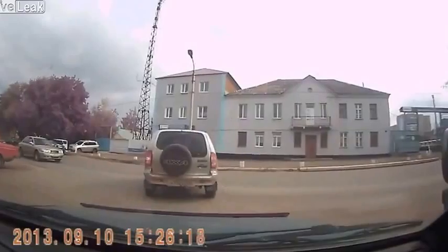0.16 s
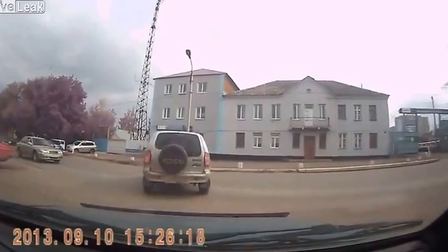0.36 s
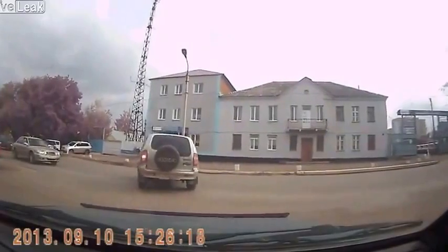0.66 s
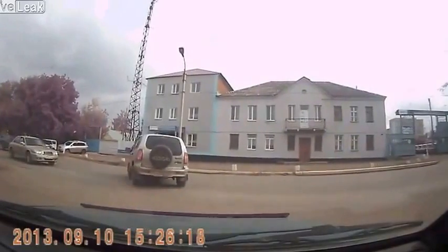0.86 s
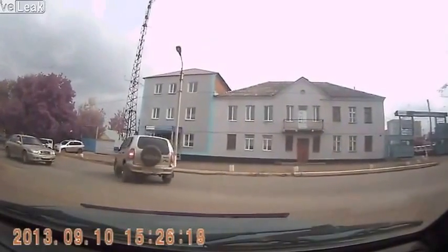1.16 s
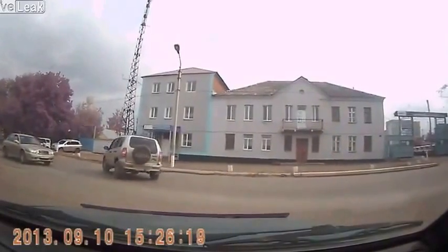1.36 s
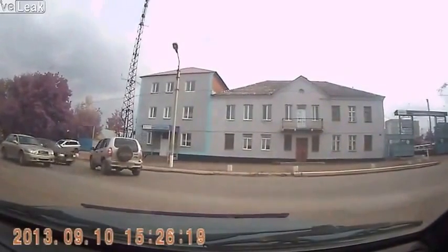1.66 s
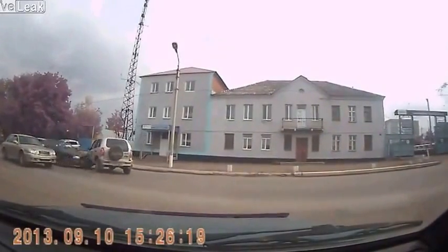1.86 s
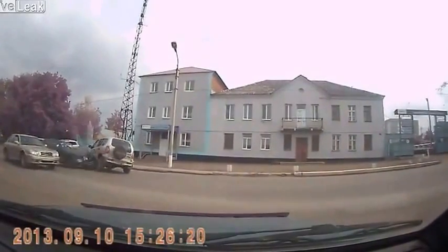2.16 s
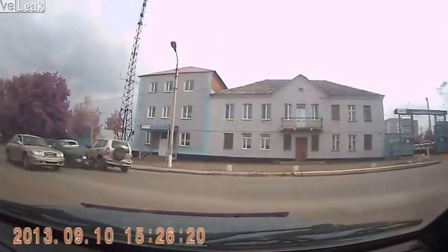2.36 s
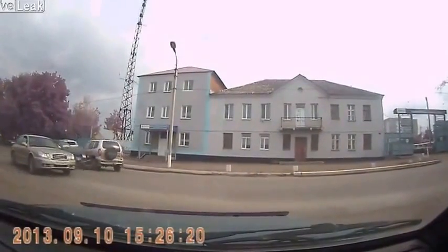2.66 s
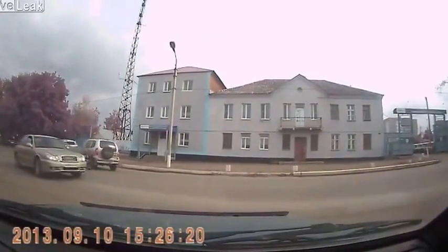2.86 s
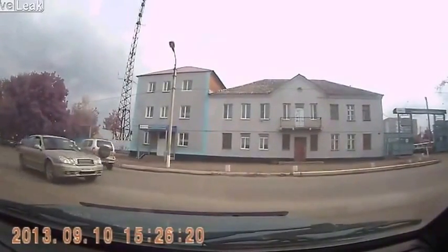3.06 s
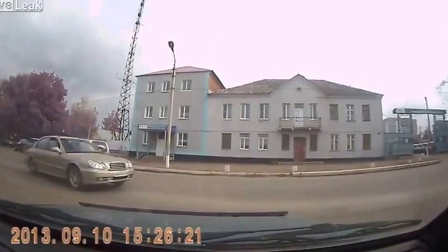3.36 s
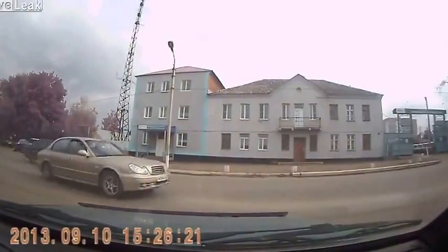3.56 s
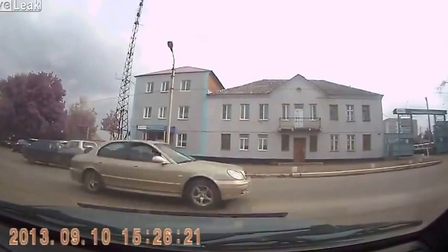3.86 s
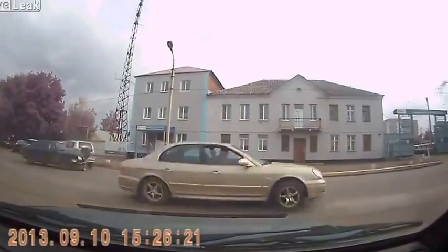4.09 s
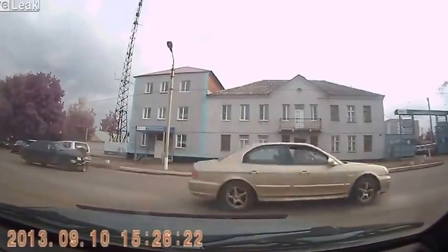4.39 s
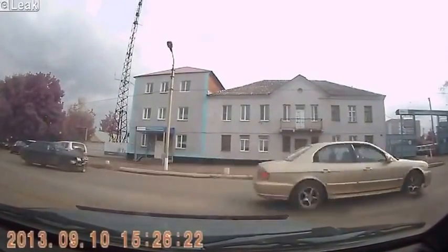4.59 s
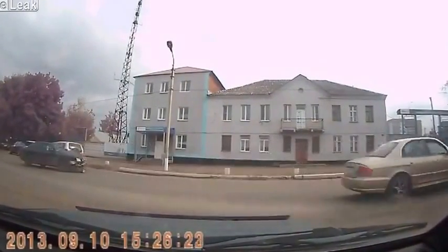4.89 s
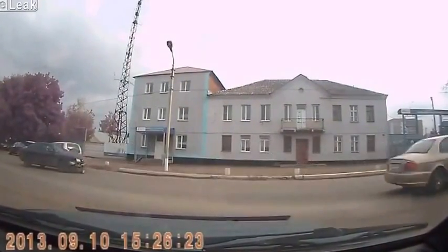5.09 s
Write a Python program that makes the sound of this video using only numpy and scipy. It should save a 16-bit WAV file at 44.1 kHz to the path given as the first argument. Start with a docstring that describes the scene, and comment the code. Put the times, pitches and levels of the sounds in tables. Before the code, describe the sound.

Heard from inside a rumbling car, another car's tyres squeal in a hard skid that ends in a short, dull crunch.

```python
"""A car's engine booms in the cabin as the car rolls to a stop and idles; the road rumbles and shakes
the trim. Ahead, another car brakes hard: its tyres stick and slip on the road, so they squeal, sinking
in pitch, until it hits something with a short dull crunch. Soft handling thumps sound close by, plastic
trim clicks, a car drives past and something squeaks faintly. A dashboard camera hears it all and loses
the high treble."""
import sys
import numpy as np
from scipy import signal
from scipy.fft import rfft, irfft, next_fast_len
from scipy.io import wavfile
from scipy.ndimage import uniform_filter1d

SR = 44100
rng = np.random.default_rng(int(sys.argv[2]) if len(sys.argv) > 2 else 0)


def generate_wav(sig):
    """Save sig (samples, or channels by samples) to the path in sys.argv[1] as 16-bit PCM at SR."""
    pcm = np.round(np.clip(np.atleast_2d(sig).T, -1, 1) * 32767).astype(np.int16)
    wavfile.write(sys.argv[1], SR, pcm)


N = 230863
T = np.arange(N) / SR
CRASH_S = 2.055
OVERTONE_GROWTH_DB_PER_S = 12  # the skid's high sounds swell as the braking car nears


def undb(db):
    """Turn decibels into a number to multiply by."""
    return 10 ** (np.asarray(db) / 20)


def unit(x):
    """Scale a signal so that its average power is 1."""
    return x / np.sqrt(np.mean(x ** 2) + 1e-18)


def curve(points):
    """Join (time, value) points with straight lines."""
    return np.interp(T, *np.transpose(points))


def glide(start, length, first_hz, last_hz):
    """A pitch that moves evenly from one value to another."""
    return np.interp(T, [start, start + length], [first_hz, last_hz])


def envelope(start, length, attack_s, fall_db_per_s):
    """A loudness that rises to 1, holds until the length is over, then dies away."""
    age = T - start
    return np.clip(age / attack_s, 0, 1) * undb(-fall_db_per_s * np.maximum(age - length, 0))


def wander(rate):
    """A smooth random wobble of typical size 1 that changes about rate times a second."""
    size = next_fast_len(N, real=True)
    hz = np.arange(size // 2 + 1) * SR / size
    spectrum = rfft(rng.standard_normal(size)) * np.exp(-(hz / rate) ** 2)
    return unit(irfft(spectrum, size)[:N])


def shape(x, points):
    """Turn each frequency up or down along a line of (frequency [Hz], gain [dB]) points."""
    hz, db = np.transpose(points)
    all_hz = np.arange(N // 2 + 1) * SR / N + 1
    gain = undb(np.interp(np.log(all_hz), np.log(hz), db))
    return irfft(rfft(x) * gain, N)


def band(x, low_hz, high_hz):
    """Keep what lies between two frequencies, without delaying it."""
    sos = signal.butter(3, [low_hz, high_hz], "band", fs=SR, output="sos")
    return signal.sosfiltfilt(sos, x, padtype=None)


def resonate(x, modes):
    """Make a sound ring at each (frequency [Hz], width [Hz], gain [dB])."""
    return sum(undb(db) * signal.lfilter(*signal.iirpeak(hz, hz / width, SR), x)
               for hz, width, db in modes)


def echoes(x, fade_s, echo_db):
    """Add a dense cloud of reflections that dies away by 60 dB in fade_s."""
    t = T[:SR // 2]
    tail = rng.standard_normal(len(t)) * np.exp(-np.log(1000) * t / fade_s)
    return x + undb(echo_db) * signal.fftconvolve(x, tail / np.linalg.norm(tail))[:N]


def engine_firings():
    """Count the firings so far: the engine labours as the car slows, then recovers to idle."""
    # engine speed: (time [s], firing rate [Hz])
    firing_rate = [(0, 25.99), (.42, 27.48), (.78, 23.76), (1.22, 23.5), (1.34, 30.32), (1.95, 30.21),
                   (2.5, 28.64), (3.7, 29.65), (4.2, 28.81), (5.23, 29.29)]
    return np.cumsum(curve(firing_rate)) / SR


def engine(firings):
    """Firings pump the cabin air; the boom has stronger overtones while the car still rolls."""
    # tones of the boom: (multiple of the firing rate, gain while rolling [dB], gain at idle [dB])
    harmonics = [(1, 1.25, 0.35), (2, -10.5, -24), (3, -17, -23), (4, -18.5, -28.5), (5, -21.5, -28)]
    # loudness of the whole boom: (time [s], level [dB])
    loudness = [(0.0, -19), (0.35, -20.5), (0.44, -31.5), (0.49, -21.5), (0.76, -19.5), (0.86, -28.5),
                (1.02, -24), (1.22, -31), (1.28, -23.5), (2.08, -30), (2.14, -21), (2.46, -38), (2.64, -26),
                (3.19, -28.5), (3.58, -21.5), (3.95, -27.5), (4.08, -21), (5.23, -23)]
    idle = np.clip((T - .9) / .5, 0, 1)
    boom = 0
    for k, rolling_db, idle_db in harmonics:
        wobble_db = (1.3 if k == 1 else 2.6) * wander(10)
        db = rolling_db + (idle_db - rolling_db) * idle + wobble_db
        boom += undb(db) * np.sin(2 * np.pi * (k * firings + rng.random()))
    return np.sqrt(2) * boom * undb(curve(loudness))


def road(firings, passing):
    """Road noise comes through the body and swells when it shakes or a car passes; the trim chatters."""
    # tone of the road through the body: (frequency [Hz], gain [dB])
    road_colour = [(24, -47.5), (40, -2.5), (65, -5.5), (81, -15), (98, -17), (135, -11.5), (182, -22),
                   (236, -23), (302, -22.5), (444, -28.5), (535, -24.5), (763, -36.5), (932, -30),
                   (1330, -34.5), (1600, -49), (2080, -78.5), (3520, -120)]
    # tone of the hiss and rattle: (frequency [Hz], gain [dB])
    hiss_colour = [(880, -45), (1500, -7.5), (1680, -12), (1960, -2.5), (2040, 2.5), (2130, -7), (2250, -2),
                   (2350, -6.5), (2440, -9), (2720, -7), (3360, -10.5), (3710, -8.5), (4350, -16.5),
                   (5660, -41.5), (9570, -120)]
    # spells of shaking: (start [s], length [s], rumble [dB], roar [dB], scrub [dB], rattle [dB])
    shakes = [(-.03, .28, -24, -32, -46.5, -47), (.27, 0.15, -42, -45, -67.5, -69.5),
              (0.47, 0.26, -29.5, -37, -52.5, -55), (0.774, 0.39, -37.5, -52.5, -72, -76),
              (1.245, 0.24, -39, -51, -74, -70.5), (2.2, 0.14, -40, -42.5, -55, -55.5),
              (2.494, 0.35, -39.5, -63, -58.5, -71), (2.822, 0.38, -35, -44, -53, -58),
              (2.926, 0.073, -51, -46.5, -45.5, -54.5), (3.093, 0.048, -35, -53.5, -46.5, -60),
              (3.281, .28, -34.5, -44.5, -58, -65), (3.757, 0.038, -35.5, -39.5, -48.5, -52.5),
              (3.87, 0.078, -30.5, -35, -47.5, -54.5), (3.989, 0.085, -29, -39, -52.5, -56),
              (4.659, 0.1, -38, -38, -52, -60), (4.901, .33, -43, -36.5, -49.5, -55),
              (4.977, 0.019, -55, -43, -54, -47)]
    spells = np.array([envelope(start, length, attack_s=.022, fall_db_per_s=153.5)
                       for start, length, *_ in shakes])
    strengths = undb(np.array(shakes)[:, 2:]).T
    shake_rumble, shake_roar, shake_scrub, rattle = np.sqrt(strengths ** 2 @ spells ** 2)
    # a steady bed, the shaking and the passing car add up by their powers
    rumble_gain = undb(1) * np.hypot(undb(-42.5), shake_rumble)
    roar_gain = np.hypot(np.hypot(undb(-49), shake_roar), passing)
    scrub_gain = np.hypot(np.hypot(undb(-58), shake_scrub), undb(-10) * passing)
    hiss_gain = np.hypot(np.hypot(undb(-61), rattle), undb(-16.5) * passing)
    # each firing jolts the trim, most while the engine labours
    jolt = (np.exp(-3 * (firings % 1)) - .3) * np.interp(T, [.8, 1.4], [1, .4])
    noise = shape(rng.standard_normal(N), road_colour)
    rumble = unit(band(noise, 42, 190))
    roar = unit(band(noise, 189, 835) * undb(4.5 * jolt + 1.9 * wander(40)))
    chatter = undb(6.6 * jolt + 2 * wander(110))
    # the dashboard rings with the scrub of the tyres
    dashboard = resonate(rng.standard_normal(N) * chatter, [(1142, 200, -.5), (1283.4, 34, 4)])
    scrub = unit(band(dashboard, 850, 1606))
    hiss = unit(shape(rng.standard_normal(N), hiss_colour) * chatter)
    return rumble * rumble_gain + roar * roar_gain + scrub * scrub_gain + hiss * hiss_gain


def thumps():
    """Soft, low handling thumps near the microphone ring briefly; a longer contact sounds duller."""
    # handling bumps: (time [s], strength [dB], contact time [s])
    bumps = [(.492, -23.5, 0.00039), (3.202, -15, 0.0048), (3.232, -17, 0.0054), (3.249, -19, 0.0039),
             (3.427, -13.5, 0.0034), (3.437, -13.5, 0.0018), (3.549, -25, 0.0012), (3.772, -25.5, 0.0012),
             (3.95, -28, 0.0011), (5.189, -26.5, 0.00044)]
    # the short dull ring of a thump: (frequency [Hz], time to fade by 60 dB [s], gain [dB])
    ring_tones = [(108, 0.15, -8.5), (132, 0.072, 3), (236, 0.072, -8), (306, 0.027, -9), (430, .04, -14.5),
                  (564, 0.04, -13.5)]
    push = np.zeros(N)
    for start, db, contact in bumps:
        pulse = np.exp(-np.pi * ((T - start - contact / 2) / contact * 2) ** 2)
        push += undb(db) * pulse / pulse.sum()
    t = T[:SR // 2]
    ring = sum(undb(db) * np.sin(2 * np.pi * hz * t) * np.exp(-np.log(1000) * t / fade_s)
               for hz, fade_s, db in ring_tones)
    return -signal.fftconvolve(push, ring)[:N]


def stick_slip(hz, scatter):
    """Phase of a surface that catches and lets go unevenly; scatter is a share of the pitch."""
    unrest = .6 * wander(250) + .65 * wander(50)
    return 2 * np.pi * np.cumsum(hz * (1 + scatter * unrest)) / SR


def tyre(hz, scatter, tone_gain, octave_gain, third_db):
    """One squealing tyre: three harmonics, each fluttering with the grip and blurred by the street."""
    phase = stick_slip(hz, scatter)
    grip = undb(4.74 * wander(100))
    squeal = 0
    for k, gain in enumerate([tone_gain, octave_gain, octave_gain * undb(third_db)], 1):
        harmonic = echoes(grip * np.sin(k * phase), fade_s=.2, echo_db=-2)
        slow_level = np.sqrt(uniform_filter1d(harmonic ** 2, size=2200) + 1e-9)
        squeal += harmonic / slow_level * gain  # only the fast flutter stays
    return squeal


def scuff(hz, tone_gain, octave_gain):
    """Torn rubber rubs during a chirp: noise that rides on its first two harmonics."""
    phase = 2 * np.pi * np.cumsum(hz) / SR
    rub, slip = wander(130), wander(130)
    return undb(-8) * sum(gain * (rub * np.sin(k * phase) + slip * np.cos(k * phase))
                          for k, gain in enumerate([tone_gain, octave_gain], 1))


def chirps():
    """Tyres slip for a moment, squealing and scuffing, as they first bite and as the car comes to rest."""
    # short slips: (start [s], length [s], first pitch [Hz], last pitch [Hz], tone [dB], octave [dB])
    slips = [(0.814, 0.022, 1510, 1520, -57.5, -74), (0.889, 0.043, 1487, 1570, -50, -69.5),
             (0.983, .085, 1378, 1408, -38.5, -64.5), (0.971, .13, 1520, 1447, -56.5, -60),
             (2.202, .15, 980, 993, -43.5, -42), (2.288, 0.14, 1213, 1175, -40, -63)]
    out = 0
    for start, length, first_hz, last_hz, tone_db, octave_db in slips:
        hz = glide(start, length, first_hz, last_hz)
        contact = envelope(start, length, attack_s=.0067, fall_db_per_s=334)
        tone, octave = contact * undb(tone_db), contact * undb(octave_db)
        out += tyre(hz, scatter=.024, tone_gain=tone, octave_gain=octave, third_db=-29.5)
        out += scuff(hz, tone, octave)
    return out


def clicks():
    """Plastic trim snaps: the panel rings and its edges rattle for a few hundredths of a second."""
    # snaps: (time [s], level [dB], time to fade by 60 dB [s], rattle gain [dB])
    snaps = [(.861, -42, .014, 0), (2.442, -37, 0.047, 7.5), (4.07, -21.5, 0.018, -2.5),
             (4.076, -20.5, 0.026, -9), (4.092, -34.5, 0.011, 5.5), (4.151, -32.5, 0.027, -6.5),
             (4.681, -48, .015, -5), (4.691, -23, 0.032, -4.5), (5.127, -40, 0.048, -2)]
    # ringing of the trim, first the panel, then its edges: (frequency [Hz], width [Hz], gain [dB])
    trim = [(1293, 120, -3.5), (2250, 250, -5), (3070, 220, -6), (3670, 160, -7.5)]
    panel_hz = trim[0][0]
    rattle = undb(-3.5) * unit(band(resonate(rng.standard_normal(N), trim), 1100, 4060))
    out = 0
    for start, db, fade_s, rattle_db in snaps:
        age = np.maximum(T - start, 0)
        force = undb(db) * np.minimum(age / .0012, 1) * np.exp(-np.log(1000) * age / fade_s)
        out += force * (np.sin(2 * np.pi * panel_hz * age) + undb(rattle_db) * rattle)
    return echoes(out, fade_s=.044, echo_db=-5)


def slides():
    """Locked tyres squeal; most sink in pitch as the car slows and grow louder as it nears."""
    # long squeals: (start [s], length [s], first pitch [Hz], last pitch [Hz], final tone [dB],
    # growth [dB/s], final octave [dB])
    squeals = [(1.145, 1.025, 1315, 1296, -27.5, 10, -43), (1.185, .6, 1256, 1228, -38.5, 0.5, -44),
               (1.8, .235, 1190, 1178, -23, 19, -40.5), (1.36, .74, 1150, 1100, -31.5, 22, -41),
               (1.235, .94, 1358, 1372, -33.5, 7.5, -52.5), (1.66, .065, 1335, 1300, -28.5, -2.5, -44)]
    # the braking car bounces on its springs, so the squeal surges just before the crash
    bounce_hz, build_s, peak_s = 6.3, .3, 2.015
    build = np.clip(1 + (T - CRASH_S) / build_s, 0, 1) ** .5
    bounce_db = 1.5 * build * np.cos(2 * np.pi * bounce_hz * (T - peak_s))
    out = 0
    for start, length, first_hz, last_hz, final_db, growth, final_octave_db in squeals:
        hz = glide(start, length, first_hz, last_hz)
        left_s = np.clip(start + length - T, 0, length)
        contact = envelope(start, length, attack_s=.032, fall_db_per_s=170.5)
        tone_db = final_db - growth * left_s + bounce_db
        octave_db = final_octave_db - OVERTONE_GROWTH_DB_PER_S * left_s + .5 * bounce_db
        tone = contact * undb(tone_db + 1.5 * wander(33))
        octave = contact * undb(octave_db + 2.8 * wander(31))
        out += tyre(hz, scatter=.018, tone_gain=tone, octave_gain=octave, third_db=-21)
    return out


def grit():
    """Sliding rubber scrubs over the grit, louder and louder until the crash."""
    # tone of the grit in the cabin: (frequency [Hz], gain [dB])
    colour = [(1000, -57), (1700, -20), (1860, -20), (1970, -9), (2250, -2.5), (2390, -9.5), (2610, -12.5),
              (2780, -7), (3180, -13), (3320, -19), (3600, -21.5), (3700, -9.5), (3850, -19.5),
              (4010, -17.5), (4350, -34), (5660, -29), (9570, -120)]
    locked_s = 1.185
    scrub = unit(shape(rng.standard_normal(N) * undb(3.4 * wander(200)), colour))
    sliding = envelope(locked_s, CRASH_S - locked_s, attack_s=.14, fall_db_per_s=124)
    return scrub * sliding * undb(-40.5 - OVERTONE_GROWTH_DB_PER_S * np.maximum(CRASH_S - T, 0))


def windscreen(skid):
    """The glass lets some of the squeal's overtones through better than others."""
    # what gets through: (frequency [Hz], gain [dB])
    glass = [(1500, 0), (1750, 2), (2000, 1), (2230, 1), (2390, -5.5), (2560, 0.5), (2900, 0.5), (3350, -6),
             (3730, 3), (4000, -2.5), (4280, 10)]
    return shape(skid, glass)


def crash():
    """Bumper and panels crumple in a dense run of cracks, dulled by the closed cabin."""
    # tone of the crunch: (frequency [Hz], gain [dB])
    colour = [(29, -49), (50, -11.5), (81, 1.5), (108, -7), (145, 5), (175, -3), (203, -20), (318, -9.5),
              (421, -17), (489, -10.5), (840, -31), (1320, -15), (1680, -35.5), (2260, -29.5), (4350, -40),
              (5660, -52.5), (9570, -120)]
    cracks = rng.standard_normal(N) * undb(2 * wander(93))
    crunch = shape(cracks, colour)
    thud = unit(band(crunch, 56, 200))
    crumple = undb(-4) * unit(band(crunch, 210, 900))
    splinters = undb(-10) * unit(band(crunch, 950, 4900))
    impact = undb(-21) * envelope(CRASH_S, length=.085, attack_s=.031, fall_db_per_s=75.5)
    return (thud + crumple + splinters) * impact


def passing_car():
    """Loudness of a car crossing ahead: its tyre roar is strongest at the nearest point."""
    nearest_s, nearest_m, speed_m_per_s = 4.25, 3.3, 8.3
    distance_m = np.hypot(nearest_m, speed_m_per_s * (T - nearest_s))
    return undb(-44.5) * nearest_m / distance_m


def squeak():
    """A short, faint, rough squeak that falls in pitch."""
    start_s, length_s = 4.44, .077
    hz = glide(start_s, length_s, first_hz=2320, last_hz=1880)
    tone = np.sin(stick_slip(hz, scatter=.03)) * wander(150)
    loudness = undb(-51) * envelope(start_s, length_s, attack_s=.022, fall_db_per_s=222.5)
    return echoes(tone, fade_s=.08, echo_db=-2.5) * loudness


def scene():
    """Mix the car we sit in with the skid and crash outside, in one channel."""
    firings = engine_firings()
    driving = engine(firings) + road(firings, passing_car())
    skid = windscreen(slides() + chirps() + grit())
    return (driving + skid + crash() + thumps() + clicks() + squeak())[None]


def record(dry):
    """The camera cuts the high treble; a very faint high whine pulses with the sound."""
    top_hz, whine_hz = 4400, 7800
    narrow = signal.sosfilt(signal.butter(18, top_hz, fs=SR, output="sos"), dry)
    whine = undb(-62.5) * narrow * np.cos(2 * np.pi * whine_hz * T)
    final_cut = signal.ellip(8, .2, 70, 9300, fs=SR, output="sos")
    return signal.sosfilt(final_cut, narrow + whine)


dry = scene()
out = record(dry)
generate_wav(out)
```